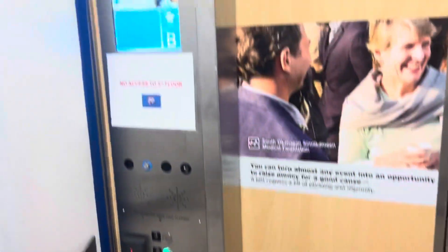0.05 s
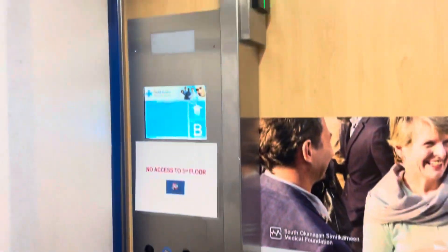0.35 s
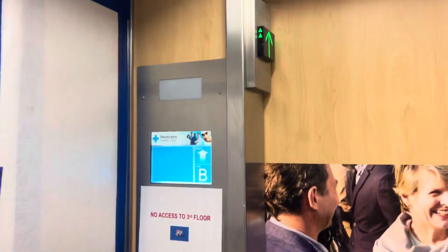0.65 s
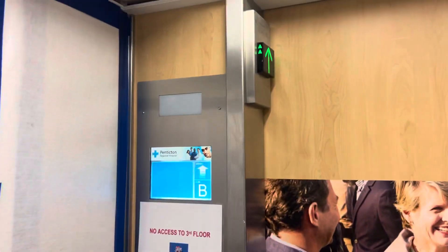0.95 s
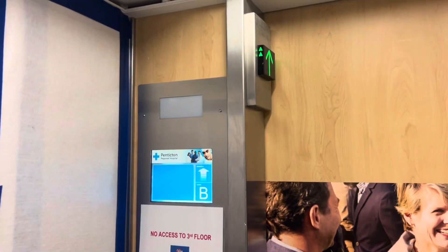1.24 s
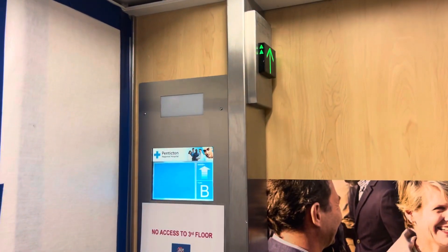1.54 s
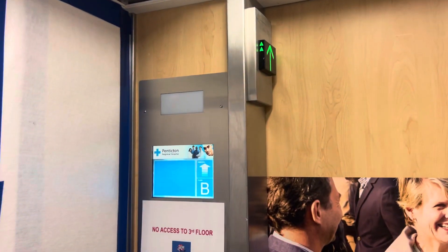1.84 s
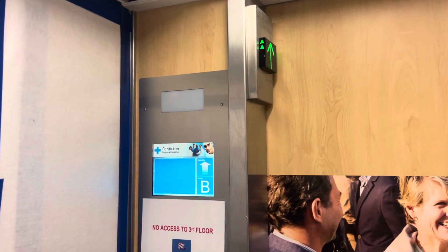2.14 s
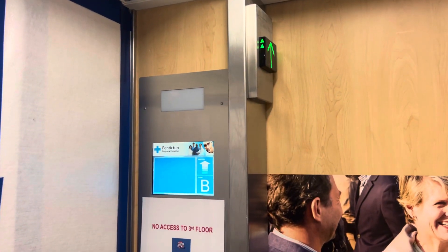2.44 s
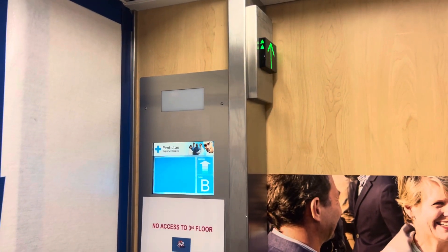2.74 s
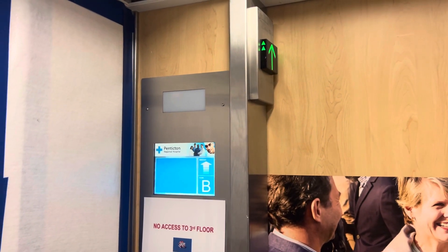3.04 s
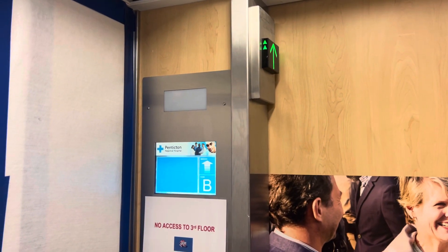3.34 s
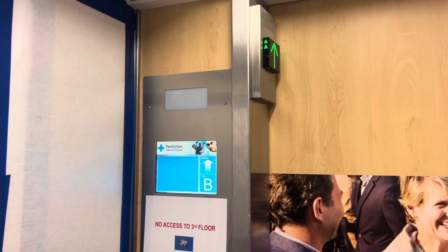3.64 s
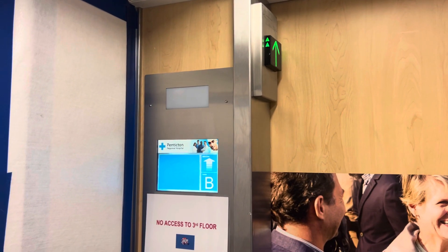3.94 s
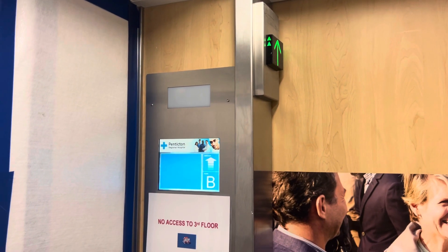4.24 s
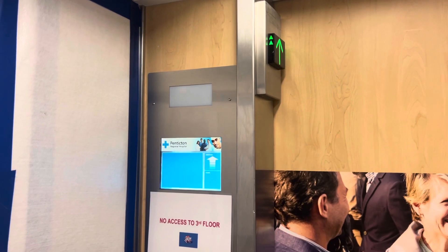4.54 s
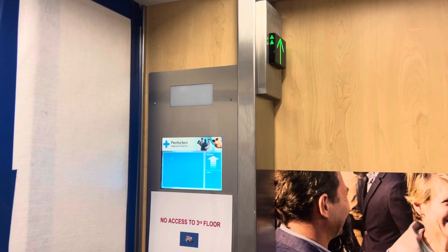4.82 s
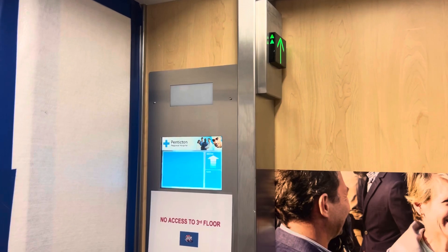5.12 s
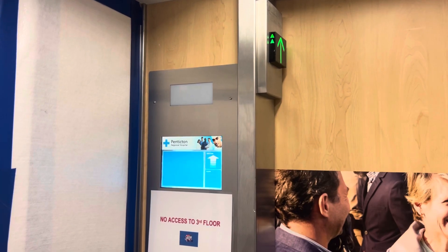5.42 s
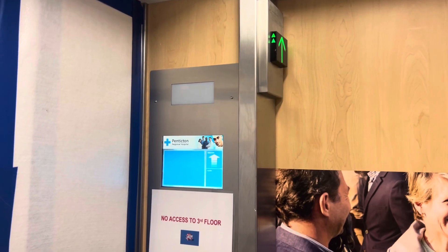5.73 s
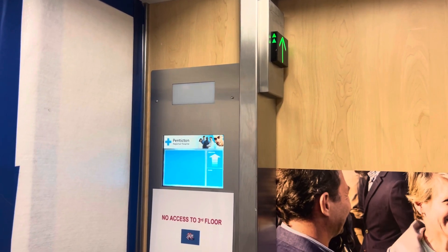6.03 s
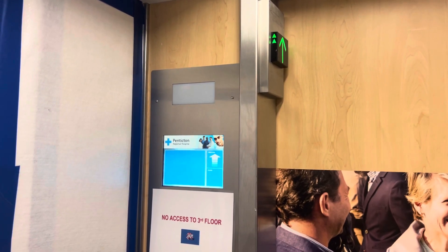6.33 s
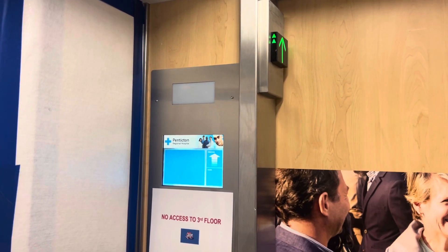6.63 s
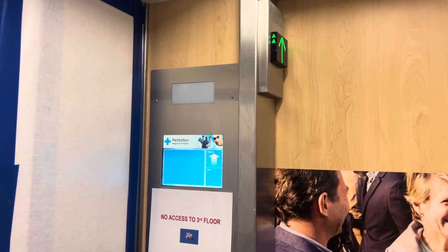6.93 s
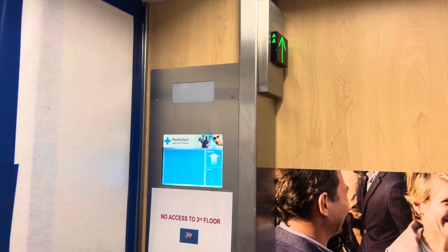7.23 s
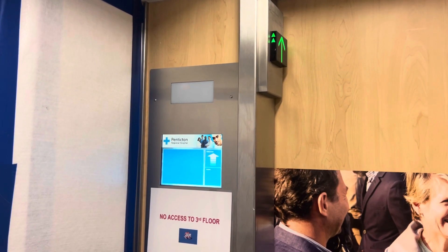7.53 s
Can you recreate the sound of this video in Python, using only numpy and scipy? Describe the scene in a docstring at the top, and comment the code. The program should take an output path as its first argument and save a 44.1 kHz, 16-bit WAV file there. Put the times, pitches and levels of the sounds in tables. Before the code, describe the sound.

Sharp, irregular metallic clicks rattle inside a rising elevator over a low, throbbing rumble that builds after a starting thud.

```python
"""A dull thud shakes a small panelled elevator car, and its air booms as it lurches and sets off upwards.
As it gathers speed the motor's tone climbs through the car's resonances, and the drive's throbbing hum
and the rush of the guides on their rails build up under a steady hiss, with brief scrapes.
In front, a loose metal part clicks in uneven bursts: each strike snaps, chatters and rings briefly.
Twice something squeaks faintly."""
import sys
import numpy as np
from scipy import signal
from scipy.fft import rfft, irfft, next_fast_len
from scipy.io import wavfile
from scipy.ndimage import uniform_filter1d

SR = 44100
rng = np.random.default_rng(int(sys.argv[2]) if len(sys.argv) > 2 else 0)


def unload_audio(sound):
    """Save the sound as a 16-bit wav file, at the path given as the first command line argument."""
    columns = np.transpose(np.atleast_2d(sound))
    # keep every value between -1 and 1, then stretch to whole-number steps
    steps = np.round(np.clip(columns, -1, 1) * 32767)
    wavfile.write(sys.argv[1], SR, steps.astype(np.int16))


N = 338247
TIME = np.arange(N) / SR


def from_db(db):
    """Decibels to gain."""
    return 10 ** (np.asarray(db) / 20)


def rms_one(x):
    """Scale to unit power."""
    return x / np.sqrt(np.mean(x ** 2) + 1e-20)


def pan(db):
    """Left and right gains for a level difference; positive leans left."""
    return from_db(np.array([[db], [-db]]) / 2)


def in_time(curve):
    """A curve of (seconds, value) points, read at every sample."""
    return np.interp(TIME, *np.transpose(curve))


def per_bin(points, size):
    """A curve over log frequency, read at each bin of a transform."""
    hz, value = np.transpose(points)
    bin_hz = np.arange(size // 2 + 1) * SR / size
    return np.interp(np.log(bin_hz + 1), np.log(hz), value)


def colour(x, spectrum):
    """Causal (minimum-phase) EQ through the given (Hz, dB) points."""
    size = 2 * next_fast_len(x.shape[-1] // 2 + 4096)
    cepstrum = irfft(np.log(from_db(per_bin(spectrum, size))))
    cepstrum[1:size // 2] *= 2
    cepstrum[size // 2 + 1:] = 0
    return irfft(rfft(x, size) * np.exp(rfft(cepstrum)))[..., :x.shape[-1]]


def drift(rate_hz):
    """A smooth random wobble of unit power, drawn every 100 samples."""
    pole = np.exp(-200 * np.pi * rate_hz / SR)
    white = rng.standard_normal(N // 100 + 2002)
    slow = signal.lfilter([1], [1, -2 * pole, pole * pole], white)[2000:]
    return np.interp(np.arange(N) / 100, np.arange(len(slow)), rms_one(slow))


def fade(t, t60):
    """Free decay from t = 0, silent before."""
    return (t >= 0) * np.exp(-np.log(1000) * np.maximum(t, 0) / t60)


def swell(t, attack, t60):
    """A rise over the attack, then free decay."""
    return np.clip(t / attack, 0, 1) * fade(np.maximum(t - attack, 0), t60)


def held(t, hold, t60):
    """Full strength from t = 0 for a while, then free decay."""
    return (t >= 0) * fade(np.maximum(t - hold, 0), t60)


def tone(hz):
    """A sine that follows a pitch curve."""
    return np.sin(2 * np.pi * np.cumsum(hz) / SR)


# The car's stereo image. Each row: frequency in Hz, likeness of left and right from 0 to 1.
LIKENESS = [(60, 1), (125, 0.86), (250, 0.81), (500, 0.59), (1000, 0), (2500, 0.1), (6000, 0.4),
            (8500, 0.06)]
def diffuse(count):
    """White stereo noise as it fills the car: alike on both sides in the bass."""
    size = 2 * next_fast_len(count // 2 + 1)
    alike = np.clip(per_bin(LIKENESS, size), 0, 1)
    mid, side = rfft(rng.standard_normal((2, size)))
    stereo = np.sqrt(1 + alike) * mid + np.sqrt(1 - alike) * side * [[1], [-1]]
    return rms_one(irfft(stereo)[:, :count])


def shaped(envelope, spectrum):
    """Diffuse noise under an envelope, passed through a body with the given spectrum."""
    white = diffuse(N)
    return colour(white * envelope, spectrum) / np.std(colour(white[0], spectrum))


def resonant_noise(hz, half_width_hz):
    """Diffuse noise in one resonance that may glide; unit power."""
    narrow = signal.butter(2, half_width_hz, fs=SR, output="sos")
    band = signal.sosfilt(narrow, diffuse(N) + 1j * diffuse(N))
    carrier = np.exp(2j * np.pi * np.cumsum(hz * np.ones(N)) / SR)
    return rms_one(np.real(band * carrier))


# EQ of the hiss and of the airy top. Each row: frequency in Hz, gain in dB.
HISS_EQ = [(500, -15.5), (850, -11.5), (1050, 0.5), (1300, 1), (1550, -1), (1700, -10.5), (1870, -33.5),
           (2350, -13.5), (2900, -26.5), (3700, -17.5), (4600, -46.5), (6400, -28), (7600, -55)]
AIR_EQ = [(2000, -1), (6500, -7), (12000, 5), (14000, -16.5)]
def hiss_bed(speed, hiss_db, air_db, air_rise_db):
    """A steady band of hiss on the left, and a faint rush of air that swells with speed."""
    hiss = from_db(hiss_db) * rms_one(colour(rng.standard_normal(N), HISS_EQ))
    air = rms_one(colour(rng.standard_normal((2, N)), AIR_EQ))
    return hiss * pan(22.3) + from_db(air_db + air_rise_db * speed) * air


# The bed of hum. Each row: pitch in Hz, relative level at rest in dB, change at full speed in dB.
HUM_TONES = [(119.2, -63.5, -1), (145, -77, 20), (170.9, -61.5, 3.5), (230.6, -66.5, 1), (275, -72.5, 8.5),
             (792, -84.5, 5.5), (1278, -83.5, 1)]
def hum(speed, trim_db, waver_db):
    """Wavering tones that never stop; most of them grow with speed."""
    out = 0
    for hz, db, rise_db in HUM_TONES:
        gain = from_db(db + trim_db + rise_db * speed + waver_db * drift(3.4))
        out = out + gain * tone(hz + 0.83 * drift(6.7))
    return out * pan(-0.5)


# The whine's two tones. Each row: pitch in Hz, relative level in dB.
WHINE_TONES = [(3537, -93), (3596, -87.5)]
# Its fader. Each row: time in seconds, gain in dB.
WHINE_FADER = [(0.3, -3), (0.7, -0.5), (2.5, 1), (5.3, 2), (7.6, 0.5)]
def whine(trim_db):
    """A thin, flickering whine on the left."""
    tones = sum(from_db(db + trim_db + drift(11)) * tone(hz + 1.2 * drift(13)) for hz, db in WHINE_TONES)
    return from_db(in_time(WHINE_FADER)) * tones * pan(11)


# Blooms in the hum. Each row: start in seconds, length in seconds, pitch in Hz, peak level in dB.
HUM_SWELLS = [(0.0, 3.2, 554.5, -70), (3.68, 0.3, 554, -65), (2.5, 1.0, 272, -56), (3.85, 0.7, 227.5, -53),
              (4.15, 1.05, 555.5, -62.5), (4.85, 0.3, 228, -52), (5.7, 0.9, 228, -51.5),
              (6.05, 1.75, 555.5, -61.5), (6.9, 0.4, 227, -55)]
def hum_swells(waver_db):
    """Now and then the car's panels take up one tone of the hum and let it go again."""
    out = 0
    for start, length, hz, db in HUM_SWELLS:
        arch = np.sin(np.pi * np.clip((TIME - start) / length, 0, 1))
        out = out + from_db(db + waver_db * drift(3.1)) * arch * tone(hz + 0.73 * drift(3.4))
    return out * pan(-1)


# EQ of the low roll and of the bright slide. Each row: frequency in Hz, gain in dB.
ROLL_EQ = [(90, -13.5), (150, 4), (175, 1.5), (200, -2.5), (240, -4), (310, -8.5), (370, -8), (520, -13.5),
           (720, -20.5), (1100, -23), (1700, -30.5), (2400, -31.5), (3500, -64)]
SLIDE_EQ = [(1000, 0.5), (2300, 8.5), (2950, 7), (3600, 8), (4800, 7.5), (6400, -1), (7600, -3),
            (11500, -23.5), (14000, -25.5), (16000, -44)]
def guides(speed, roll_db, roll_rise_db, slide_db, slide_rise_db, grit_db):
    """The guides roll and slide along their rails, louder with speed, with a slightly gritty hiss."""
    settling = from_db(-54) * fade(TIME, t60=12)   # an opening rumble that slowly dies away
    roll_gain = np.hypot(from_db(roll_db + roll_rise_db * (speed - 1)), settling)
    rolling = roll_gain * rms_one(colour(diffuse(N), ROLL_EQ))
    slide_gain = from_db(slide_db + slide_rise_db * (speed - 1) + grit_db * drift(30))
    sliding = slide_gain * rms_one(colour(diffuse(N), SLIDE_EQ))
    return rolling * pan(-0.64) + sliding


# Scrape cues. Each row: start in seconds, length in seconds, peak level in dB,
# centre of the EQ peak in Hz, its reach to either side as a pitch ratio.
SCRAPES = [(0.016, 0.46, -76.5, 5900, 3.8), (0.099, 0.5, -74, 2390, 2), (0.292, 0.12, -73, 6900, 2.8),
           (0.3, 0.18, -74.5, 5400, 1.2), (0.547, 0.51, -81.5, 5800, 1.2), (1.534, 0.3, -77, 2410, 2),
           (1.698, 0.88, -77, 2300, 1.5), (2.548, 0.68, -75.5, 4760, 3.3), (3.499, 0.38, -75, 3600, 4),
           (4.404, 0.31, -73, 2500, 1), (6.023, 0.35, -71, 3670, 2.9), (6.397, 0.36, -74, 3600, 2.5),
           (7.204, 0.88, -73, 2750, 2.8)]
def scrapes(focus_db, skew):
    """Short swells of the sliding hiss that rise faster than they fall, each with its own EQ peak."""
    out = np.zeros((2, N))
    for start, length, db, hz, width in SCRAPES:
        now = (TIME >= start) & (TIME < start + length)
        width = max(width, 1.05)
        focus = [(hz / width, -focus_db), (hz, 0), (hz * width, -focus_db)]
        hiss = colour(colour(diffuse(now.sum()), SLIDE_EQ), focus)
        along = (TIME[now] - start) / length
        out[:, now] += from_db(db) * np.abs(np.sin(np.pi * along ** skew)) * rms_one(hiss)
    return out


# The swish's bands. Each row: first pitch in Hz, last pitch in Hz, half width in Hz, peak level in dB.
SWISH_BANDS = [(2280, 2850, 300, -76.5), (3700, 4650, 450, -82.5)]
def swish(start_s, length_s):
    """A soft rub whose two resonances glide upwards."""
    along = np.clip((TIME - start_s) / length_s, 0, 1)
    rub = sum(from_db(db) * resonant_noise(first_hz + (last_hz - first_hz) * along, half_width)
              for first_hz, last_hz, half_width, db in SWISH_BANDS)
    return np.sin(np.pi * along) * rub


def light_tick(start_s, hz, level_db):
    """A tiny hard contact rings for an instant and echoes faintly in the car."""
    t = TIME - start_s
    ping = fade(t, t60=0.012) * np.sin(2 * np.pi * hz * t)
    echo = from_db(-26) * fade(t, t60=0.25) * resonant_noise(hz, half_width_hz=400)
    return from_db(level_db) * (ping + echo)


# Squeak cues. Each row: start in seconds, length in seconds, first pitch in Hz, last pitch in Hz,
# relative level in dB.
SQUEAKS = [(3.325, 0.1, 3200, 3190, -67), (5.647, 0.0977, 1090, 1010, -54.5)]
def squeaks(trim_db):
    """Brief, rough rubbing tones that sag in pitch."""
    out = np.zeros((2, N))
    for start, length, first_hz, last_hz, db in SQUEAKS:
        now = (TIME > start) & (TIME < start + length)
        along = (TIME[now] - start) / length
        hz = first_hz + (last_hz - first_hz) * along
        phase = 2 * np.pi * np.cumsum(hz) / SR + 2 * rng.random((2, 1))
        # uneven slips scatter the tone's strength and phase
        rubbing = drift(160)[now] * np.sin(phase) + drift(160)[now] * np.cos(phase)
        out[:, now] += from_db(db + trim_db) * np.sqrt(np.sin(np.pi * along)) * rubbing
    return out


# EQ of the booming air. Each row: frequency in Hz, gain in dB.
BOOM_EQ = [(25, -19), (36, -10), (48, -7.5), (65, -8), (81, 10), (95, -8.5), (115, -2.5), (135, -20.5),
           (250, -71)]
# The car's lurches. Each row: start in seconds, peak level in dB, 60 dB decay time in seconds.
LURCHES = [(0.33, -41.5, 1.3), (1.05, -37, 0.15), (1.72, -44, 1.8), (2.221, -38.5, 2.9), (2.59, -37, 0.47),
           (2.8, -40.5, 0.71)]
def boom(speed, rest_db, cruising_db, speed_exponent):
    """Random shaking rings the car's lowest air resonance: after each lurch, and steadily under way."""
    air = colour(diffuse(N), BOOM_EQ)
    levelled = air / np.sqrt(uniform_filter1d(np.mean(air ** 2, axis=0), size=4000))
    lurch_power = sum((from_db(db) * swell(TIME - start, attack=0.031, t60=t60)) ** 2
                      for start, db, t60 in LURCHES)
    steady_power = from_db(rest_db) ** 2 + (from_db(cruising_db) * speed ** speed_exponent) ** 2
    bass_only = signal.butter(2, 400, fs=SR, output="sos")
    return signal.sosfilt(bass_only, levelled * np.sqrt(lurch_power + steady_power)) * pan(-1.5)


# Resonances the motor sweeps through. Each row: centre in Hz, peak level in dB, half width in Hz.
CAR_RESONANCES = [(168, -55.5, 4.7), (215, -54.5, 12), (242, -51, 1.8)]
def motor(speed, rest_hz, full_hz, waver_db):
    """A soft tone climbs with speed and swells at each resonance of the car."""
    hz = rest_hz + (full_hz - rest_hz) * speed
    gain = sum(from_db(db) / (1 + ((hz - centre) / width) ** 2) for centre, db, width in CAR_RESONANCES)
    return gain * from_db(waver_db * drift(28)) * tone(hz + 5 * drift(14)) * pan(-2.1)


# How hard the drive shakes the car. Each row: time in seconds, level in dB.
SHAKE = [(3.6, -39), (3.95, -32.5), (4.55, -36.5), (4.92, -33.5), (5.08, -30), (5.75, -30.5), (6.3, -35.5),
         (6.52, -33.5), (6.72, -35.5), (7.0, -32.5), (7.35, -29.5), (7.67, -33)]
# The drive's tones. Each row: pitch in Hz, level at the reference shake in dB,
# dB gained per dB of shake, entry in seconds.
DRIVE_TONES = [(78.3, -30.5, 1.5, 4.05), (95.15, -35.5, 1, 3.63), (109.8, -41.5, 0.54, 3.6)]
# Their throb, tone by tone. Each row: depth on every beat, depth on every second beat, both as shares.
THROB_DEPTHS = [(0.22, 0.22), (0.18, 0.05), (0.62, 0.1)]
REFERENCE_SHAKE_DB, FADE_IN_S = -28.5, 0.28
BEAT_S, FIRST_BEAT_S = 0.1496, 3.98
DRONE_HZ, DRONE_DB, DRONE_START_S, DRONE_DB_PER_S = 36.05, -49.5, 2.9, 1.5
def drive(wander_hz, flutter_db):
    """A deep drone enters and slowly grows; near full speed three throbbing tones join it."""
    shake_db = in_time(SHAKE) - REFERENCE_SHAKE_DB
    beats = (TIME - FIRST_BEAT_S) / BEAT_S
    drone_age = TIME - DRONE_START_S
    drone_gain = np.clip(drone_age / FADE_IN_S, 0, 1) * from_db(DRONE_DB + DRONE_DB_PER_S * drone_age)
    out = drone_gain * tone(DRONE_HZ + wander_hz * drift(2.6))
    for (hz, db, follows, start), (fast, slow) in zip(DRIVE_TONES, THROB_DEPTHS):
        fade_in = np.clip((TIME - start) / FADE_IN_S, 0, 1)
        throb = 1 + fast * np.cos(2 * np.pi * beats) + slow * np.sin(np.pi * beats)
        gain = from_db(db + follows * shake_db + flutter_db * drift(11.0))
        out = out + fade_in * throb * gain * tone(hz + wander_hz * drift(2.7))
    return np.sqrt(2) * out * pan(-1.7)


# EQ of a thud's body and of its knock. Each row: frequency in Hz, gain in dB.
THUD_EQ = [(50, -26.5), (115, 10), (170, -1.5), (265, 4.5), (370, -5.5), (520, -11), (750, -19),
           (1500, -29.5), (3000, -38), (5600, -46.5), (8000, -51), (12000, -80)]
KNOCK_EQ = [(200, -16.5), (400, 7), (700, -4), (1100, -5.5), (1700, -14), (4000, -32.5), (10000, -62)]
# Dull blows on the car. Each row: start in seconds, relative level in dB, hold in seconds,
# 60 dB decay time in seconds, share of hard contact in dB.
THUDS = [(0.318, -41, 0.06, 1, -23.5), (0.436, -44.5, 0.012, 0.26, -11), (0.471, -48.5, 0.042, 0.5, -8.5),
         (0.532, -46.5, 0.0096, 0.45, -13), (0.58, -48, 0.02, 0.7, -17), (0.65, -53, 0.01, 0.77, -18),
         (0.786, -58.5, 0.0046, 0.07, 2), (0.816, -49, 0.011, 0.43, -18), (0.928, -52, 0.0044, 0.16, -9),
         (0.965, -45.5, 0.0061, 0.2, -14), (1.02, -49, 0.0034, 0.43, -12), (2.461, -60.5, .005, .1, 1.5),
         (2.589, -49, 0.12, 0.89, -30), (2.94, -52.5, 0.005, 0.15, -5), (2.971, -46, 0.0063, 0.068, -25),
         (5.241, -59, 0.091, 0.36, -3.5)]
def thuds(body_db, knock_db, attack_db):
    """Blows set the wall panels and the shaft rumbling; hard ones add a short knock."""
    body_power, knock_power, impulses = np.zeros((3, N))
    for start, db, hold, t60, hard_db in THUDS:
        body_power += (from_db(db) * held(TIME - start, hold, t60)) ** 2
        knock_power += (from_db(db + hard_db) * held(TIME - start, hold, t60 / 2)) ** 2
        impulses[round(start * SR)] = from_db(db + hard_db + attack_db)
    body = from_db(body_db) * shaped(np.sqrt(body_power), THUD_EQ)
    knock = from_db(knock_db) * shaped(np.sqrt(knock_power), KNOCK_EQ)
    return body + knock + colour(impulses, KNOCK_EQ)


# The loose part's modes. Each row: pitch in Hz, relative level in dB, 60 dB decay time in seconds.
METAL_MODES = [(2088, -14, 0.18), (2250, -20, 0.13), (2363, -16, 0.12), (2535, -18, 0.13),
               (3116, -15.5, 0.14), (3332, -8, 0.17), (3445, -13, 0.1), (3556, -9.5, 0.12),
               (3730, -9.5, 0.16), (3822, -12, 0.15), (3956, -15.5, 0.13), (4220, -21, .12),
               (4828, -18, .13), (5033, -18.5, .13), (6350, -23, .12)]
def ringing(strikes, trim_db, variation):
    """Every strike sets the same cluster of modes ringing, in nearly the same mix."""
    t = TIME[:SR // 4]
    hz, mode_db, t60 = np.transpose(METAL_MODES)[:, :, None]
    modes = from_db(mode_db) * fade(t, t60) * np.exp(2j * np.pi * (hz * t + rng.random(hz.shape)))
    sides = np.exp(1j * rng.normal(0, 0.14, (2, len(hz))))   # each side meets a mode at its own phase
    out = np.zeros((2, N))
    for start, db, _ in strikes:
        mix = 1 + variation * rng.standard_normal(len(hz))
        out[:, round(start * SR):][:, :len(t)] += from_db(db + trim_db) * np.imag((sides * mix) @ modes)
    return out * pan(1.6)


# Brightness of a full strike. Each row: time in seconds, low-pass corner in Hz.
STRIKE_BRIGHTNESS = [(2.8, 13800), (3.7, 9500), (4.6, 6930), (6.6, 5800)]
FULL_STRIKE_DB = -50.5
def contact(start, db, hardening):
    """The push of one strike: a gentler one stays in contact longer and sounds duller."""
    full_hz = np.interp(start, *np.transpose(STRIKE_BRIGHTNESS))
    corner_hz = full_hz * from_db(hardening * (db - FULL_STRIKE_DB))
    pulse = np.exp(-2 * np.pi * corner_hz * TIME[:32])
    return from_db(db) * pulse / pulse.sum()


# EQ of the bare snap and of its bright sizzle. Each row: frequency in Hz, gain in dB.
SNAP_EQ = [(700, -18), (2200, 1.5), (3500, 2.5), (5000, -7.5), (6500, -9.5), (8400, -2.5), (9800, -12),
           (12000, -4), (15000, -6.5)]
SIZZLE_EQ = [(3000, -14), (7000, -8), (9500, -13), (12000, -5.5), (13400, -7), (14600, 2), (15800, 1)]
def snaps(strikes, trim_db, sizzle_db, variation):
    """The bright instant at which metal meets metal and the sizzle after it, much alike every time."""
    t = TIME[:SR // 6]
    shared_grain = rng.standard_normal(len(t)) + 0.93 * rng.standard_normal((2, len(t)))
    snap, sizzle = np.zeros((2, 2, N))
    for start, db, snap_db in strikes:
        grain = shared_grain + variation * rng.standard_normal(len(t))
        grain = from_db(snap_db) * signal.lfilter(contact(start, db, hardening=1.7), [1], grain)
        snap[:, round(start * SR):][:, :len(t)] += grain * fade(t, t60=0.032)
        sizzle[:, round(start * SR):][:, :len(t)] += grain * fade(t, t60=0.15)
    return from_db(trim_db) * colour(snap, SNAP_EQ) + from_db(sizzle_db) * colour(sizzle, SIZZLE_EQ)


# EQ of the crack. Each row: frequency in Hz, gain in dB.
CRACK_EQ = [(700, -10.5), (1200, 2.5), (2200, 0), (2800, 0), (3600, 1.5), (5200, -1), (6300, -6),
            (8400, -1.5), (9500, -22.5), (10600, -10), (12200, -18.5), (13400, -31.5), (14700, -8.5),
            (16000, -10.5)]
# Its rebounds. Each row: delay in seconds, level against the first crack in dB.
REBOUNDS = [(0.009, -6), (0.018, 0)]
def crack_response(tick_db, crack_db, crack_t60, stereo_width, car_t60):
    """One contact as it arrives: a tick, a short crack, its rebounds and the echoes of close walls."""
    t = TIME[:SR // 2]
    rebounds = sum(from_db(db) * fade(t - delay, crack_t60) for delay, db in REBOUNDS)
    grain = rng.standard_normal(len(t)) + stereo_width * rng.standard_normal((2, len(t)))
    crack = from_db(crack_db) * grain * (fade(t, crack_t60) + rebounds)
    tick = from_db(tick_db) * (t == 0)
    echoes = diffuse(len(t)) * fade(t, car_t60)
    return colour(tick + crack + echoes, CRACK_EQ)


def cracks(strikes, trim_db, variation, chatter_s, chatter_db):
    """The part hits one spot and chatters; a slight shift of the contact changes each crack."""
    # three layers of grain: the first at full strength, the other two blended in at random
    blend = rng.normal(0, variation, (len(strikes), 3))
    blend[:, 0] = 1
    chatter_delays = chatter_s * rng.uniform(0.15, 1, (len(strikes), 3))
    out = 0
    for shares, delays in zip(blend.T, chatter_delays.T):
        pushes = np.zeros(N)
        for (start, db, _), share, delay in zip(strikes, shares, delays):
            pulse = contact(start, db + trim_db, hardening=1.5)
            pushes[round(start * SR):][:len(pulse)] += share * pulse
            pushes[round((start + delay) * SR):][:len(pulse)] += from_db(chatter_db) * pulse
        response = crack_response(tick_db=2, crack_db=-0.5, crack_t60=0.04,
                                  stereo_width=0.44, car_t60=0.29)
        out = out + signal.oaconvolve(pushes[None], response, axes=1)[:, :N]
    return out * pan(0.72)


# The loose part's hits. Each row: start in seconds, relative level in dB, gain of snap and sizzle in dB.
STRIKES = [(2.772, -52.5, 0), (2.909, -53, 0), (3.055, -52, -1), (3.0933, -51.5, -3), (3.1450, -52, -1.5),
           (3.2296, -51, 0), (3.3722, -50.5, 0), (3.44, -52, 0), (3.485, -54, 0), (3.548, -52, -0.5),
           (3.632, -52, -3.5), (3.655, -55, -1), (3.7164, -51, -2), (3.785, -53, 0.5), (3.943, -51, -3),
           (4.018, -52.5, -5), (4.108, -52, -5), (4.1995, -53, -1.5), (4.3371, -50.5, -0.5),
           (4.5947, -50.5, -5), (4.6752, -51, -1.5), (5.0658, -49.5, -5.5), (5.1551, -50, -5),
           (5.6364, -48, -7), (5.7104, -50, -2), (6.0336, -52.5, -11), (6.0872, -49.5, -8),
           (6.1807, -48.5, -7), (6.427, -51.5, -13), (6.499, -51.5, -4), (6.595, -52.5, -11)]
def loose_part():
    """A loose metal part clicks: every strike layers a chattering crack, a snap and a short ring."""
    crack = cracks(STRIKES, trim_db=-2.5, variation=0.22, chatter_s=0.055, chatter_db=-11.5)
    snap = snaps(STRIKES, trim_db=-1.0, sizzle_db=-12, variation=0.6)
    return crack + snap + ringing(STRIKES, trim_db=-5.0, variation=0.2)


# The car gathers speed. Each row: time in seconds, share of full speed.
SPEED = [(1.2, 0.0083), (1.95, 0.14), (2.45, 0.53), (2.9, 0.77), (3.35, 0.93), (4.0, 0.95)]
def scene():
    """Rumble, knocks, rails and hum as heard from the middle of the car."""
    speed = in_time(SPEED)
    rumble = (drive(wander_hz=0.26, flutter_db=0.9)
              + boom(speed, rest_db=-49, cruising_db=-40.0, speed_exponent=12.0)
              + motor(speed, rest_hz=154, full_hz=250.7, waver_db=2.0)
              + hum_swells(waver_db=1.5))
    accents = (loose_part()
               + thuds(body_db=-2.0, knock_db=3.0, attack_db=29.0)
               + squeaks(trim_db=-0.5)
               + light_tick(start_s=1.433, hz=5600, level_db=-64))
    rails = (guides(speed, roll_db=-48.5, roll_rise_db=11, slide_db=-71, slide_rise_db=13.5, grit_db=1)
             + scrapes(focus_db=16.5, skew=0.6)
             + swish(start_s=1.41, length_s=0.33))
    bed = (hiss_bed(speed, hiss_db=-72.0, air_db=-96.5, air_rise_db=6.0)
           + hum(speed, trim_db=0.5, waver_db=4.0)
           + whine(trim_db=2.5))
    return bed + rails + rumble + accents


def record(dry):
    """The deepest bass and the very top are cut; a 6 ms fade closes the end."""
    bass_cut = signal.butter(4, 27, "high", fs=SR, output="sos")
    top_cut = signal.ellip(10, 0.2, 80, 15800, fs=SR, output="sos")
    fade_out = np.minimum((TIME[-1] - TIME) / 0.006, 1)
    return signal.sosfilt(top_cut, signal.sosfilt(bass_cut, dry) * fade_out)


dry = scene()
out = record(dry)
unload_audio(out)
```